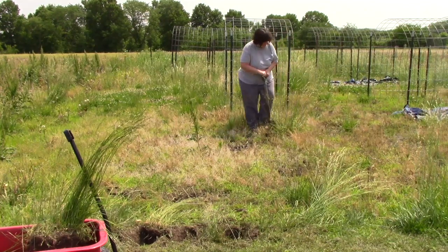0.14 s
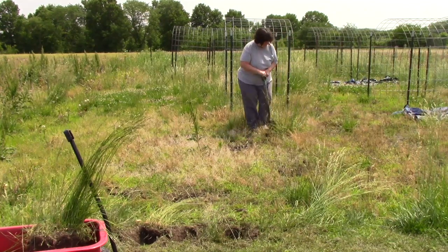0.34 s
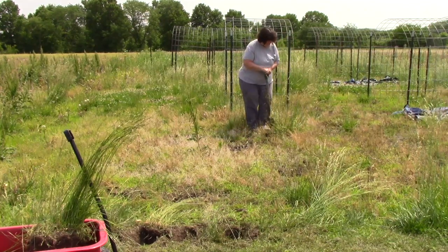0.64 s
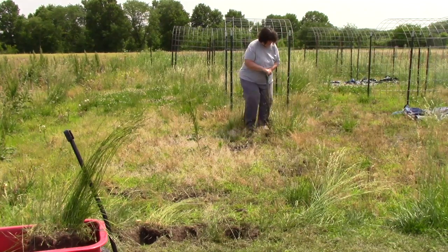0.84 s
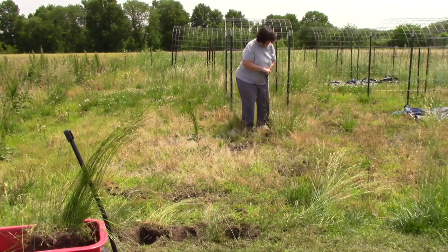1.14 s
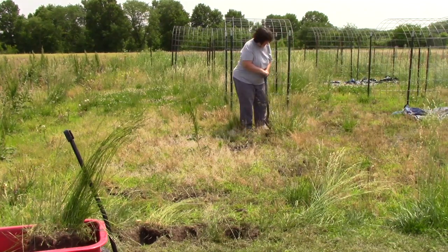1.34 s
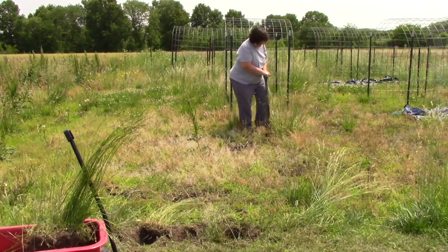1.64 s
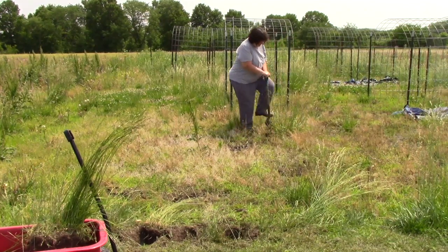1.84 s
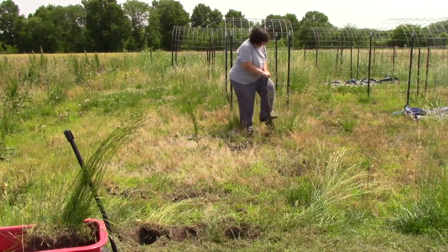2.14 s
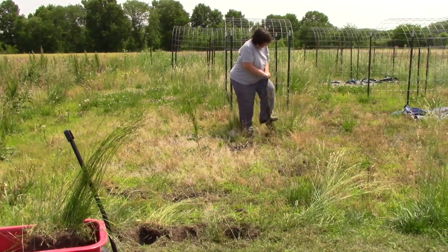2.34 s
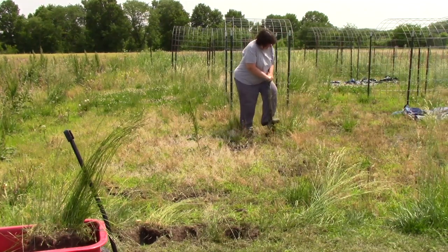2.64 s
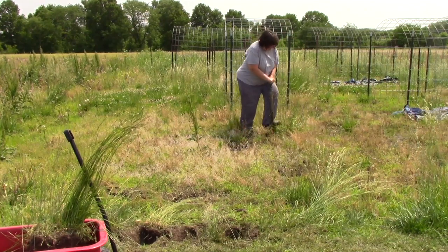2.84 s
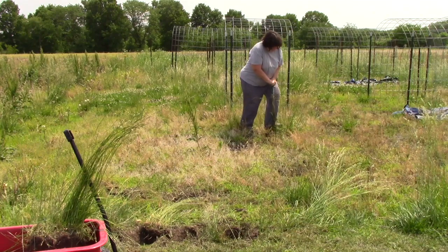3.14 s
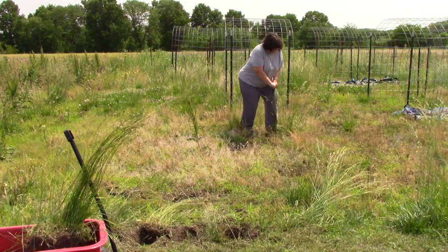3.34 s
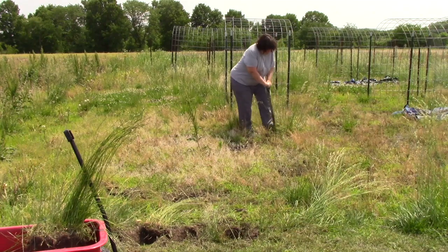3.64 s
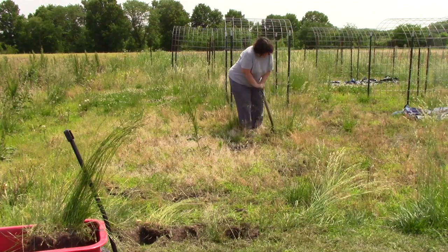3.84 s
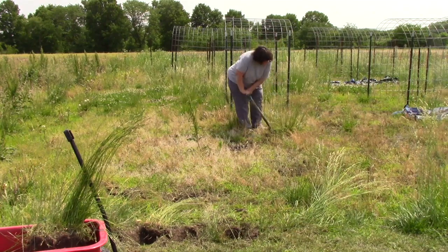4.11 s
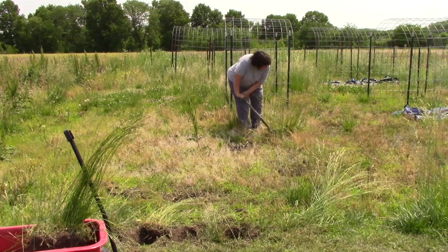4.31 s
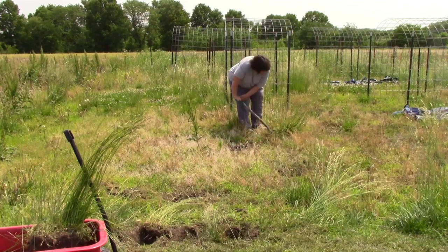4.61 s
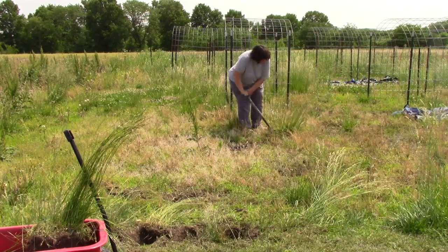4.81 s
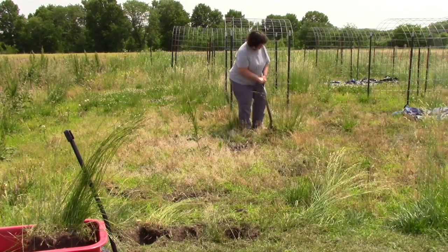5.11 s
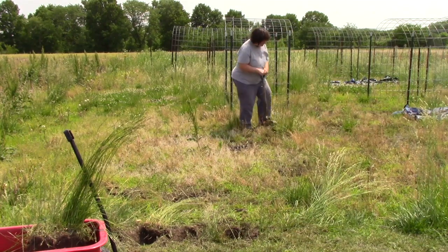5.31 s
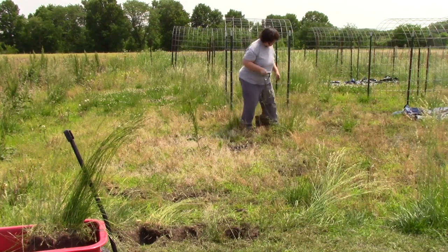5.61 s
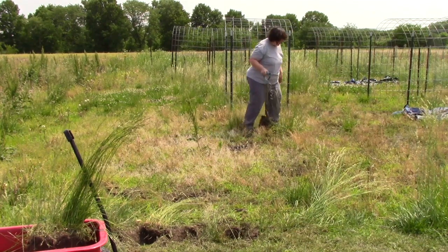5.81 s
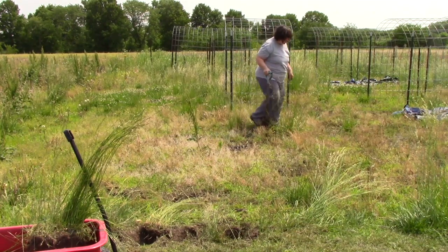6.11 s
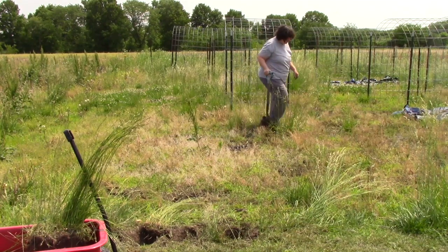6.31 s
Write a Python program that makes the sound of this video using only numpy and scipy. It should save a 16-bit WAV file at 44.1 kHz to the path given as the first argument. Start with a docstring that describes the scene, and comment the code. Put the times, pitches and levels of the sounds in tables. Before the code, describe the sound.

Birds whistle and chip over faint digging in grass and soil, with low gusts of wind buffeting the microphone.

```python
"""A soft hush of air and leaves, low wind and far bird chatter fill an open field, where someone
works a shovel into wet turf. Stems and crumbs fracture in a dense crackle, and the blade knocks.
Whistles, chips, a buzzy song, quick flicks, faint hoots and a far trill carry over the grass; a wobbling
syrinx roughens the notes. Whistles and hoots echo from the tree lines; song and calls have a short
diffuse tail. Turbulent eddies thump the two microphone ports, hardest about five seconds in."""
import sys
import numpy as np
from scipy import signal
from scipy.fft import rfft, irfft, next_fast_len
from scipy.io import wavfile
from scipy.ndimage import uniform_filter1d

SR = 44100
rng = np.random.default_rng(int(sys.argv[2]) if len(sys.argv) > 2 else 0)


def materialize(psi):
    """Save the field psi as 16-bit PCM at rate SR to the path in sys.argv[1].

    A 1-D psi becomes a single channel; in a 2-D psi each row is a channel.
    """
    bounded = np.clip(np.atleast_2d(psi).T, -1, 1)
    quanta = np.round(bounded * 32767).astype(np.int16)
    wavfile.write(sys.argv[1], SR, quanta)


N = 284886
TIME_S = np.arange(N) / SR
ANTIPHASE = np.array([[1], [-1]])  # adds a side signal to the left, subtracts it from the right


def undb(db):
    """Amplitude ratio of a level in decibels."""
    return 10 ** (np.asarray(db) / 20)


def unit(x):
    """Normalisation to rms 1."""
    return x / np.sqrt(np.mean(x ** 2))


def curve(rows):
    """Linear interpolation of (time_s, value) rows at every sample."""
    return np.interp(TIME_S, *np.transpose(rows))


def colour(x, points):
    """Spectral shaping by (frequency_hz, gain_db) points."""
    hz, db = np.transpose(points)
    size = next_fast_len(N)
    f = np.arange(size // 2 + 1) * SR / size + 1
    gain = undb(np.interp(np.log(f), np.log(hz), db))
    return irfft(rfft(x, size) * gain, size)[..., :N]


def walk(rate_hz):
    """Random modulation of rms 1: held steps, smoothed twice."""
    hold = int(SR / rate_hz)
    steps = np.repeat(rng.standard_normal(N // hold + 1), hold)
    return unit(uniform_filter1d(uniform_filter1d(steps, hold), hold)[:N])


def pan(x, db):
    """Level difference between two channels, left louder by db."""
    return x * undb(np.array([[db], [-db]]) / 2)


def syrinx(notes, buzz_hz, swing_hz, waver_hz, throb_db, overtone_db):
    """Frequency and amplitude modulation add sidebands to notes of (time_s, pitch_hz, level_db) points."""
    out = np.zeros(N)
    buzz_phase = 2 * np.pi * np.cumsum(buzz_hz * (1 + .4 * walk(250))) / SR
    bend_hz = swing_hz * np.sin(buzz_phase) + waver_hz * walk(70)
    for note in notes:
        s, hz, db = np.transpose(note)
        span = slice(int(s[0] * SR), min(int(s[-1] * SR), N))
        t = TIME_S[span]
        phase = 2 * np.pi * np.cumsum(np.interp(t, s, hz) + bend_hz[span]) / SR
        fade = np.clip(np.minimum(t - s[0], s[-1] - t) / .004, 0, 1)
        tone = np.sin(phase) + undb(overtone_db) * np.sin(2 * phase)
        out[span] += np.sqrt(2) * undb(np.interp(t, s, db)) * fade * tone
    return out * undb(throb_db * walk(2 * buzz_hz))


def bent(rows, start_db=5.5, end_db=3.5):
    """Glides with one turning point; the end levels are relative to the level at the turn."""
    return [[(s, start_hz, db + start_db),
             (s + turn * ms / 1000, turn_hz, db),
             (s + ms / 1000, end_hz, db + end_db)]
            for s, ms, start_hz, turn_hz, end_hz, turn, db in rows]


# Contours of repeated bird phrases, by name: offset_s, pitch_hz, relative_db
CONTOURS = { "swoop": [(0, 9500, -12), (.015, 9300, -7), (.036, 8400, -2), (.057, 7400, -2),
            (.087, 7150, -2), (.128, 5700, 3), (.15, 5350, 1), (.19, 5400, -8)], "climb": [(0, 5900, -8),
            (.022, 6830, -2), (.045, 6850, 3), (.056, 7650, -4), (.075, 7330, 1), (.12, 7480, 2),
            (.18, 7600, 2)], "lift": [(0, 6570, -26), (.05, 7200, -5), (.09, 7790, -7), (.12, 7900, 0.5),
            (.15, 7970, -3)], "scoop": [(0, 3020, 8), (.01, 2420, -3), (.022, 2140, -2), (.043, 2077, -5.5),
            (.057, 2740, 4)], "arch": [(0, 7020, -12), (.04, 7800, -8), (.065, 9080, -1.5), (.1, 9620, 0),
            (.15, 9380, -4.5)], "flick": [(0, 4560, 2), (.017, 4900, -7), (.03, 3500, 5.5),
            (.042, 4540, -14)], "dip": [(-.004, 3100, -1.5), (.028, 2310, 1), (.048, 2813, 1),
            (.105, 2898, -5), (.16, 2790, -0.5), (.178, 2610, -1.5), (.2, 2640, 2.5)],
            "warble": [(-.01, 2685, -12), (.02, 2870, -3), (.042, 2840, 2.5), (.055, 2110, 2.5),
            (.066, 3050, -2), (.078, 2950, -3), (.11, 2320, -1), (.135, 2350, -6), (.162, 2420, -6),
            (.195, 2520, -1), (.23, 1930, -2), (.272, 2000, -5)], "slide": [(-.005, 3160, -8),
            (.035, 2984, 3), (.07, 2770, 1.5), (.085, 2287, -1), (.155, 2430, -0.5), (.172, 2780, 0.5),
            (.195, 2740, -2)], }


def phrases(rows):
    """Time scaling and transposition turn a contour into a note."""
    return [[(s + stretch * offset_s, ratio * hz, db + relative_db)
             for offset_s, hz, relative_db in CONTOURS[name]]
            for s, db, stretch, ratio, name in rows]


def trees(x, wet_db, echo_db, t60_s=.35, near_echo_s=.059, far_echo_s=.12):
    """Scattering by grass and leaves makes a diffuse tail; echo_db sets two tree-line reflections."""
    t = np.arange(int(.6 * SR)) / SR
    mid, side = rng.standard_normal((2, len(t))) * np.exp(-np.log(1000) * t / t60_s)
    response = mid + .33 * side * ANTIPHASE
    response *= undb(wet_db) / np.sqrt(np.sum(response[0] ** 2))
    response[:, int(near_echo_s * SR)] += undb(echo_db)
    response[:, int(far_echo_s * SR)] += undb(echo_db - 8)
    response[:, 0] += 1  # direct path
    return signal.fftconvolve(x, response, axes=1)[:, :N]


# Spectral density of the background: frequency_hz, gain_db
AIR_SPECTRUM = [(15, -50), (25, -19.5), (91, -4.5), (122, 0.5), (282, -13.5), (599, -12), (667, -11),
                (972, -13), (1760, -21.5), (4890, -25), (6230, -28), (7720, -31.5), (12900, -39),
                (15600, -51)]
# Its stereo width: frequency_hz, side_minus_mid_db
AIR_WIDTH = [(60, -68), (300, -6.5), (1000, -7.5), (5000, -5.5), (9000, -20), (11000, -46)]


def air_and_leaves(level_db=-55.5):
    """Distant incoherent sources sum to broadband noise; each octave drifts independently."""
    mid, side = rng.standard_normal((2, N))
    hush = colour(mid + colour(side, AIR_WIDTH) * ANTIPHASE, AIR_SPECTRUM)
    out = 0
    for hz in 30 * 2. ** np.arange(10):
        octave = [(hz / 2, -60), (hz / np.sqrt(2), -6), (hz, 0), (hz * np.sqrt(2), -6), (hz * 2, -60)]
        out = out + colour(hush, octave) * undb(1.1 * walk(3) + 1.1 * walk(14))
    return unit(out) * undb(level_db)


# Strength of the wind between buffets: time_s, level_db
RUMBLE_LEVELS = [(0.0, -54), (0.83, -65.5), (1.1, -53.5), (1.3, -57), (1.58, -56), (1.78, -50), (2.16, -52),
                 (2.34, -51.5), (2.97, -53.5), (4.28, -54), (4.48, -48), (4.82, -51.5), (5.11, -47.5),
                 (5.24, -27), (5.33, -35), (5.43, -36.5), (5.56, -44.5), (5.78, -52), (6.46, -64.5)]


def rumble():
    """Turbulent pressure at the microphone ports makes low-frequency noise."""
    mid, side = rng.standard_normal((2, N))
    side = colour(side, [(30, 8), (100, -18.5), (250, -9.5)]) * ANTIPHASE
    spectrum = [(20, -47), (60, -8.5), (110, 6.5), (180, -3), (350, -13), (800, -36.5), (3000, -69)]
    return unit(colour(mid + side, spectrum)) * undb(curve(RUMBLE_LEVELS) + 1.74 * walk(25))


# Chorus of many small birds: time_s, level_db, highest_start_hz
CHORUS = [(0, -88, 5560), (2, -89, 5480), (3.1, -72, 5440), (4.1, -79.5, 4930), (4.4, -67, 4490),
          (4.65, -79, 4080), (4.85, -69, 5640), (5.1, -78, 5540), (6.051, -100, 5090), (6.111, -66, 3200),
          (6.179, -65.5, 2915), (6.29, -66.5, 2700), (6.46, -69, 4550)]
# Rough far notes: start_s, length_ms, start_hz, turn_hz, end_hz, turn_fraction, level_db
FAR_NOTES = [(0, 62.5, 2860, 2630, 2570, 0.66, -64.5), (.1, 61, 3690, 4100, 4160, 0.59, -69),
             (1.33, 23.4, 3730, 4420, 4930, 0.42, -66.5), (1.46, 39.8, 2920, 2655, 2250, 0.53, -65.5),
             (6.15, 70, 3480, 3390, 3480, 0.61, -70), (.93, 35, 3420, 2850, 2660, 0.43, -64),
             (3.68, 35, 5060, 4300, 4240, 0.53, -75), (3.705, 45, 3210, 3200, 3200, .5, -67),
             (4.42, 30, 3440, 3760, 4200, 0.45, -70)]


def far_chatter(count=600, lowest_ratio=.54):
    """Short random glides blur together where scattered sound outweighs the direct path."""
    s, db, highest_hz = np.transpose(CHORUS)
    notes = []
    for when, height, glide, length, strength in rng.random((count, 5)):
        start_s = when * (N / SR - .1)
        end_s = start_s + .0084 + .0225 * length
        start_hz = np.interp(start_s, s, highest_hz) * (lowest_ratio + height * (1 - lowest_ratio))
        end_hz = start_hz * (1 + .27 * (glide - .5))
        level_db = np.interp(start_s, s, db) + 6 * (strength - .5)
        notes.append([(start_s, start_hz, level_db), (end_s, end_hz, level_db)])
    notes += bent(FAR_NOTES)
    voices = syrinx(notes, buzz_hz=200, swing_hz=200, waver_hz=64.5, throb_db=3.95, overtone_db=-46)
    return trees(pan(voices, 0), wet_db=3.8, echo_db=-29)


def crackle(spectrum, spread_db):
    """Many tiny fractures of uneven size make noise with a heavy-tailed amplitude distribution."""
    sizes = undb(spread_db * np.minimum(rng.exponential(size=N), 7))
    return unit(colour(rng.standard_normal(N) * sizes, spectrum))


# Spectral densities of brushed grass and crumbling soil: frequency_hz, gain_db
GRASS_SPECTRUM = [(3000, -2), (5800, -7), (7000, -4), (9500, -4), (12000, -12.5), (15000, -17)]
SOIL_SPECTRUM = [(500, -3.5), (1200, -2.5), (2200, -5.5), (4000, -13.5), (6000, -27)]
# Blade and boots moving through turf: peak_s, rise_s, fall_s, grass_db, soil_db
TURF_STROKES = [(.1, 0.16, 0.19, -62.5, -89.5), (.25, 0.069, 0.089, -57, -62), (1.09, 0.33, 0.09, -55, -85),
                (1.69, 0.24, 0.049, -65.5, -85), (3.23, 0.13, 0.17, -57, -85),
                (3.78, 0.11, 0.035, -54.5, -65), (3.9, 0.097, 0.054, -49, -49.5),
                (4.47, 0.38, 0.16, -66, -57.5), (5.4, 0.37, 0.32, -59, -83), (5.55, .15, 0.043, -62, -85),
                (6.17, 0.065, 0.047, -57, -71), (6.35, 0.58, 0.19, -60.5, -85)]


def shovel():
    """Friction and fracture: stems and crumbs snap densely, louder with each stroke."""
    *_, grass_db, soil_db = np.transpose(TURF_STROKES)
    grass = crackle(GRASS_SPECTRUM, spread_db=3.5) * stroke_gain(grass_db, rest_db=-68.5)
    soil = crackle(SOIL_SPECTRUM, spread_db=2.4) * stroke_gain(soil_db, rest_db=-62)
    return grass * undb(1.4 * walk(60)) + soil * undb(1.8 * walk(120))


def stroke_gain(levels_db, rest_db, drop_db=12):
    """Incoherent strokes add in power; each is drop_db down one rise or fall time from its peak."""
    power = undb(2 * rest_db)
    for (peak_s, rise_s, fall_s, *_), db in zip(TURF_STROKES, levels_db):
        from_peak = np.where(TIME_S < peak_s, (peak_s - TIME_S) / rise_s, (TIME_S - peak_s) / fall_s)
        power = power + undb(2 * (db - drop_db * from_peak))
    return np.sqrt(power)


# Whistled phrases: start_s, level_db, stretch_ratio, pitch_ratio, contour
WHISTLED_PHRASES = [(1.0, -54, .88, 1.005, "dip"), (1.5, -54, .99, .99, "warble"),
                    (2.065, -52, 1.01, 1.001, "slide"), (2.598, -53, .55, 1.13, "scoop"),
                    (2.647, -52, 1.01, 1.001, "scoop"), (5.32, -54, 1.05, .995, "dip"),
                    (5.824, -51, 1.04, 1.005, "warble")]
# Single whistles: start_s, length_ms, start_hz, turn_hz, end_hz, turn_fraction, level_db
WHISTLED_NOTES = [(.2, 137, 3130, 3120, 3020, 0.24, -67.5), (.885, 25, 2360, 2270, 2170, .5, -64),
                  (1.8, 70, 3270, 3260, 3270, .3, -70), (2.71, 66.7, 3000, 3000, 2750, 0.64, -56.5),
                  (2.71, 73.5, 2290, 2240, 2320, 0.76, -61), (2.785, 93, 2970, 2940, 2900, 0.51, -60),
                  (2.79, 45, 2660, 2463, 2600, 0.37, -55), (2.83, 42, 2580, 2520, 2320, 0.73, -58.5),
                  (4.225, 47, 3500, 4900, 3300, .55, -64), (6.43, 25.2, 2830, 3300, 3140, 0.47, -64)]


def whistler():
    """Weak modulation leaves a far bird's tone nearly pure; the tree lines reflect it clearly."""
    notes = phrases(WHISTLED_PHRASES) + bent(WHISTLED_NOTES)
    voice = syrinx(notes, buzz_hz=60, swing_hz=8, waver_hz=12, throb_db=1.5, overtone_db=-50)
    return trees(pan(voice, .8), wet_db=-10, echo_db=-8)


# Blade knocks and stem snaps: start_s, level_db, pitch_hz, t60_ms
IMPACTS = [(.245, -40, 1800, 5.7), (.61, -48, 11000, 2.7), (2.395, -48, 7000, 3), (3.767, -41, 11500, 3),
           (3.876, -46, 9500, 3), (3.878, -25.5, 1350, 6.5), (3.886, -34, 1440, 8), (3.907, -46, 9000, 2.5),
           (3.917, -34.5, 7650, 4), (4.071, -37, 1300, 6.2), (4.288, -42, 9000, 3), (5.716, -46, 8500, 3),
           (5.797, -47, 8000, 3), (5.81, -43, 6700, 3.2), (6.41, -32, 6010, 1.2)]


def knocks():
    """Each impact excites one heavily damped mode, which decays exponentially."""
    out, t = np.zeros(N), np.arange(2000) / SR
    for start_s, db, hz, t60_ms in IMPACTS:
        start = int(start_s * SR)
        envelope = np.minimum(t * hz, 1) * np.exp(-np.log(1000) * t * 1000 / t60_ms)
        ring = envelope * np.sin(2 * np.pi * hz * t)
        out[start:start + len(t)] += undb(db) * ring[:N - start]
    return out


# Harsh chips and short clean pips of nearby birds: start_s, level_db, pitch_hz, end_hz, length_ms
CHIPS_AND_PIPS = [(0.377, -43, 3290, 3270, 7.3), (.712, -54, 4830, 4980, 44),
                  (1.135, -40.5, 3200, 3130, 6.4), (1.476, -54, 4760, 4930, 41),
                  (1.891, -47.5, 4520, 3940, 49), (1.919, -46.5, 3190, 2890, 20.5),
                  (2.654, -45.5, 4600, 4510, 34.6), (2.679, -40.5, 3230, 3160, 6.6),
                  (2.982, -38.5, 4440, 3280, 48), (3.37, -45.5, 4480, 4550, 35),
                  (3.72, -41.5, 5130, 4780, 40.5), (4.498, -40.5, 4620, 4860, 28.7),
                  (5.365, -43, 4790, 4570, 44), (5.445, -53, 3950, 3750, 25), (6.231, -47, 4680, 4495, 45)]
# Quick flicks of a small bird close by: start_s, level_db, stretch_ratio, pitch_ratio, contour
FLICK_CALLS = [(.887, -54, 1.05, .99, "flick"), (2.765, -50, .85, 1.02, "flick")]


def near_calls():
    """Modulation depth sets roughness: long chips are harsh, short pips and flicks nearly clear."""
    glides = [(s, ms, 1.02 * hz, (4 * hz + end_hz) / 5, end_hz, .6, db)
              for s, db, hz, end_hz, ms in CHIPS_AND_PIPS]
    notes = bent(glides, start_db=-4, end_db=-7)
    chips = [note for note in notes if note[-1][0] - note[0][0] > .025]
    quick = [note for note in notes if note not in chips] + phrases(FLICK_CALLS)
    harsh = syrinx(chips, buzz_hz=420, swing_hz=400, waver_hz=130, throb_db=4, overtone_db=-23)
    clear = syrinx(quick, buzz_hz=200, swing_hz=30, waver_hz=30, throb_db=1.1, overtone_db=-40)
    return trees(pan(harsh + clear, -3.5), wet_db=-5, echo_db=-54)


# Phrases of the near songbird: start_s, level_db, stretch_ratio, pitch_ratio, contour
SONG_PHRASES = [(0.57, -56, 0.71, 0.99, "lift"), (1.313, -55.5, 0.82, 0.97, "lift"),
                (2.835, -54.5, 0.93, 1.001, "arch"), (3.555, -52, 1.18, 1.026, "lift"),
                (4.13, -52.5, 0.91, 0.97, "swoop"), (4.335, -52.5, 0.88, 1.012, "climb"),
                (4.97, -51.5, 1.02, 0.99, "swoop"), (5.19, -52, 0.92, 0.99, "climb"),
                (5.838, -54, 0.96, 1.0, "swoop"), (6.06, -54, 0.85, 1.027, "climb")]
# Its single slurs: start_s, length_ms, start_hz, turn_hz, end_hz, turn_fraction, level_db
SONG_SLURS = [(.63, 23, 4800, 5230, 5800, 0.45, -60), (1.39, 21, 4570, 5360, 5930, 0.82, -56),
              (2.125, 140, 6960, 7610, 6190, 0.52, -55.5)]


def buzzy_song():
    """Sidebands make a buzz on the right: widest in falling notes, narrowest in long climbs."""
    notes = phrases(SONG_PHRASES) + bent(SONG_SLURS, start_db=-18.5, end_db=-3)
    falling = [note for note in notes if note[0][1] > note[-1][1]]
    rising = [note for note in notes if note not in falling]
    climbs = [note for note in rising if len(note) > 5]
    lifts = [note for note in rising if note not in climbs]
    voice = syrinx(falling, buzz_hz=400, swing_hz=400, waver_hz=130, throb_db=4.5, overtone_db=-60)
    voice += syrinx(lifts, buzz_hz=300, swing_hz=240, waver_hz=90, throb_db=3.4, overtone_db=-60)
    voice += syrinx(climbs, buzz_hz=350, swing_hz=170, waver_hz=40, throb_db=2.6, overtone_db=-60)
    return trees(pan(voice, -5), wet_db=-.16, echo_db=-35)


def small_eddies(count):
    """Turbulence is intermittent: weak buffets come at random, 3 to 7 dB over the rumble."""
    when, strength, side, pitch, length = rng.random((5, count))
    peak_s = .15 + when * (N / SR - .3)
    level_db = np.interp(peak_s, *np.transpose(RUMBLE_LEVELS)) + 3 + 4 * strength
    return list(zip(peak_s, level_db, 8 * (side - .3), 147 + 49.5 * pitch, 7.4 + 24 * length))


# Spectrum of a buffet: pitch_multiple, gain_db
BUFFET_SPECTRUM = [(.2, -30), (.5, -7), (1.0, 1.5), (1.4, -3.5), (1.9, -18), (2.7, -25.5), (4, -48),
                   (8, -105)]
# Eddies striking the ports: peak_s, level_db, left_minus_right_db, pitch_hz, length_ms
PORT_BUFFETS = [(.96, -43, -1, 131, 8.6), (1.109, -45, 3, 134, 21), (1.826, -31.5, 1, 149, 25),
                (2.006, -42, 1, 114, 42), (2.047, -34, 2, 163, 18), (2.12, -33, 2, 130, 25),
                (2.172, -33.5, 1, 128, 16), (2.216, -26.5, -1.5, 148, 23.7), (2.268, -39.5, 4, 133, 18),
                (2.317, -42.5, -6, 207, 20), (2.619, -48, 6, 154, 12), (2.652, -44.5, 2, 153, 54),
                (2.722, -36.5, 4, 164, 14), (2.764, -39, 1.5, 152, 26), (2.957, -42.5, 4, 130, 16),
                (3.467, -43, 1, 111, 14), (3.501, -45, 1, 155, 17), (3.718, -44, 4, 186, 20),
                (3.752, -32.5, -3, 128, 9.4), (4.036, -39, 2.5, 133, 26), (4.328, -32, 4.5, 168, 38),
                (4.538, -47, -11, 134, 10), (4.695, -36.5, 7, 167, 3.7), (4.8, -28, 3.5, 167, 14.3),
                (4.867, -35.5, 4, 189, 19), (4.984, -39.5, 7, 171, 11), (5.07, -29, 9.5, 197, 11),
                (5.09, -19, 9.5, 204, 14.4), (5.1, -15, 3, 217, 11), (5.11, -13.5, -3, 230, 5.9),
                (5.12, -14.5, -6.5, 257, 7.9), (5.132, -20.5, -5, 199, 11.4), (5.161, -14, 1, 250, 6),
                (5.173, -10.5, 1, 240, 6), (5.199, -24.5, -4.5, 174, 26), (5.241, -18, -6, 220, 5.5),
                (5.257, -21, -4, 216, 11.6), (5.288, -22.5, -10, 189, 5), (5.301, -20, -7.5, 229, 6.6),
                (5.353, -32.5, -13, 200, 8.3), (5.47, -25.5, 3.5, 170, 58), (5.561, -27, -1, 148, 32),
                (5.748, -29, 2, 162, 8.5), (6.129, -38, 0, 154, 21)]


def buffets(size=8192):
    """Passing eddies make pressure bursts, most coherent between the ports in the deep bass."""
    out = np.zeros((2, N))
    t = (np.arange(size) - size // 2) / SR
    f = np.arange(size // 2 + 1) * SR / size + 1
    multiple, gain_db = np.transpose(BUFFET_SPECTRUM)
    width = np.clip(f / 330, 0, .6)
    for peak_s, db, pan_db, hz, ms in PORT_BUFFETS + small_eddies(count=30):
        spectrum = undb(np.interp(np.log(f / hz), np.log(multiple), gain_db))
        mid, side = rfft(rng.standard_normal((2, size))) * spectrum
        burst = irfft(mid + width * side * ANTIPHASE, size)
        # the eddy keeps its strength while it passes: even out the chance swells
        burst /= np.sqrt(uniform_filter1d(burst ** 2, int(1.5 * SR / hz), axis=1))
        burst *= undb(db) * np.exp(-(t / (.00078 * ms)) ** 2)
        # a quick eddy pushes and pulls alike: little is left under its pitch
        low_cut = np.minimum(f / (.49 * hz), 1) ** 2
        start = int(peak_s * SR) - size // 2
        out[:, start:start + size] += pan(irfft(rfft(burst) * low_cut, size), pan_db)
    return out


def capsules(pressure, cubic_gain=1.1):
    """Cubic nonlinearity sharpens hard gusts; the microphone's wind filter thins the lowest bass."""
    distorted = pressure * (1 + cubic_gain * pressure ** 2)
    return colour(distorted, [(20, -21), (60, 3), (100, 0)])


# Faint low hoots, one list of points each: time_s, pitch_hz, level_db
HOOT_NOTES = [
    [(1.35, 608, -68), (1.7, 608, -66), (2.1, 605, -67)],
    [(4.25, 603, -70), (4.9, 600, -70)],
    [(5.65, 599, -65.5), (6.03, 597, -64.5)],
]


def hoots():
    """Nearly steady low tones overlap their own reflections from the trees."""
    voice = syrinx(HOOT_NOTES, buzz_hz=9, swing_hz=4, waver_hz=9, throb_db=2, overtone_db=-40)
    return trees(pan(voice, .8), wet_db=-10, echo_db=-8)


# Swell of the far trill: time_s, level_db
TRILL_LEVELS = [(3.08, -64), (3.2, -57.5), (3.33, -55), (3.43, -56), (3.53, -61), (3.62, -65)]


def trill(rate_hz=32.2, voices_hz=(2736, 3220), tick_hz=5100, tick_db=-7):
    """Biphonation: two voices slide down together in each note; a high tick leads into the next."""
    cycle = ((TIME_S - 3.356) * rate_hz) % 1
    glide = 1.04 - .09 * cycle
    voices = sum(np.sin(2 * np.pi * np.cumsum(hz * glide) / SR) for hz in voices_hz)
    gate = np.sin(np.pi * np.clip(cycle / .82, 0, 1)) ** .4
    tick = np.sin(np.pi * np.clip((cycle - .75) / .25, 0, 1)) * np.sin(2 * np.pi * tick_hz * TIME_S)
    singing = (TIME_S > TRILL_LEVELS[0][0]) * (TIME_S < TRILL_LEVELS[-1][0])
    gain = undb(curve(TRILL_LEVELS) + 2 * walk(40)) * singing
    return pan(gain * (gate * voices + undb(tick_db) * tick), .8)


def scene():
    """Superposition of background, wind, digging and birds."""
    background = air_and_leaves()
    wind = capsules(rumble() + buffets())
    digging = pan(shovel() + knocks(), -.081)
    birds = far_chatter() + whistler() + near_calls() + buzzy_song() + hoots() + trill()
    return background + wind + digging + birds


def record(dry, cutoff_hz=15700):
    """Band limiting: the camera's steep low-pass filter removes the highest treble."""
    return signal.sosfilt(signal.ellip(10, .2, 60, cutoff_hz, fs=SR, output="sos"), dry)


dry = scene()
out = record(dry)
materialize(out)
```